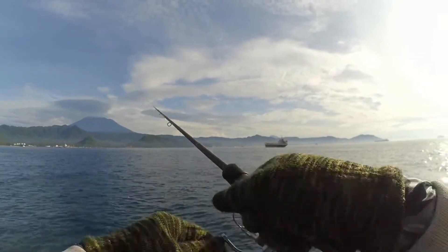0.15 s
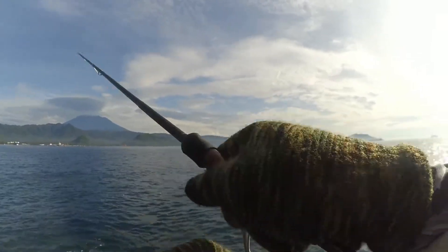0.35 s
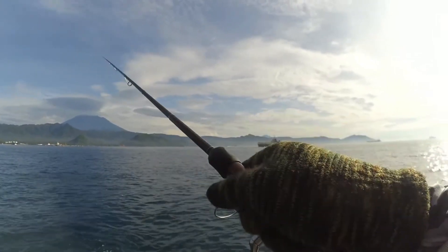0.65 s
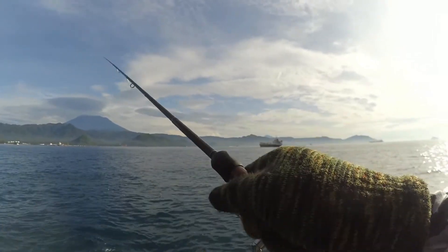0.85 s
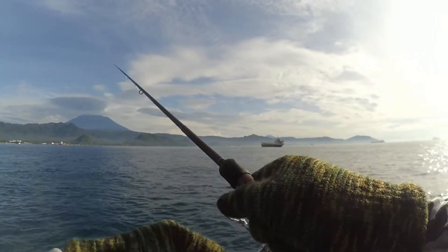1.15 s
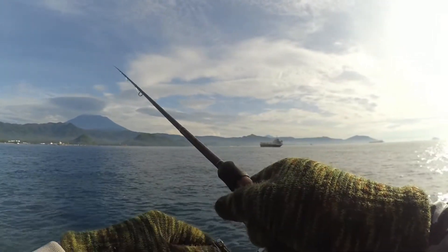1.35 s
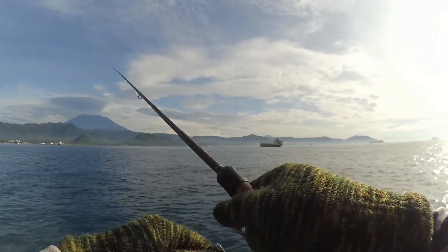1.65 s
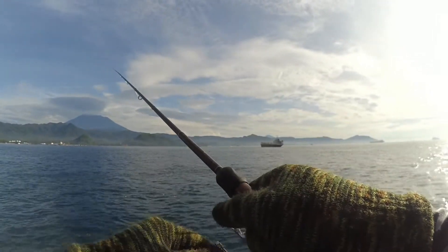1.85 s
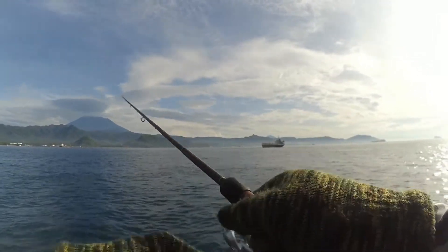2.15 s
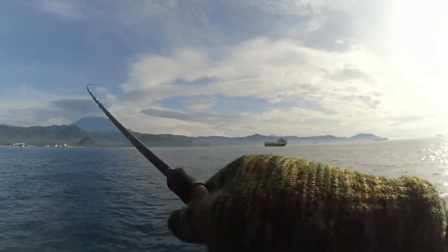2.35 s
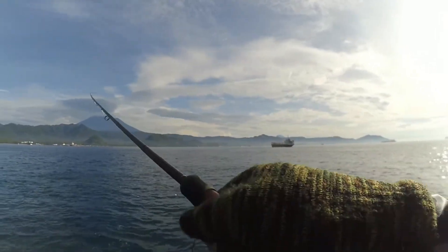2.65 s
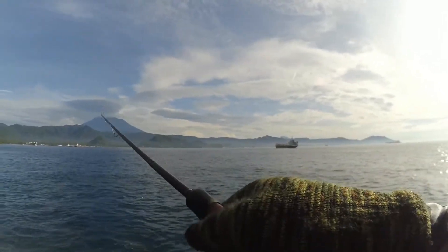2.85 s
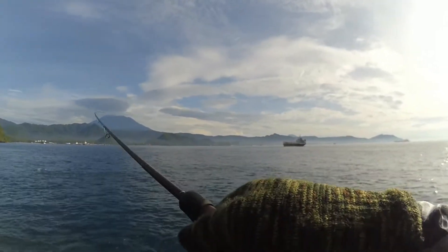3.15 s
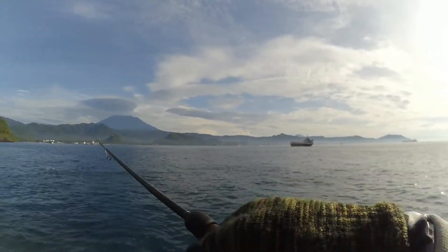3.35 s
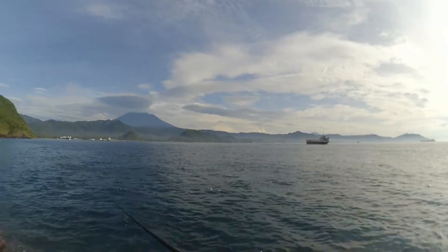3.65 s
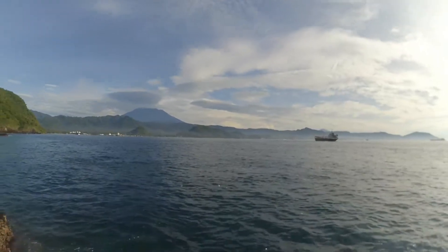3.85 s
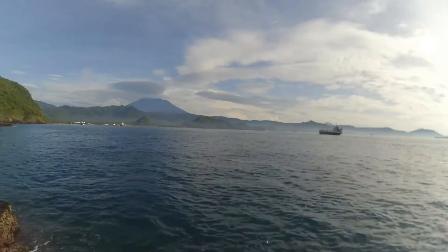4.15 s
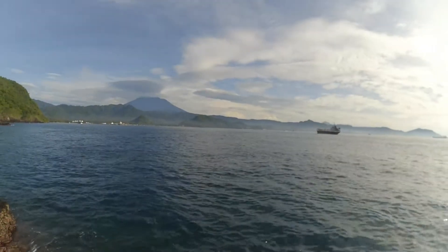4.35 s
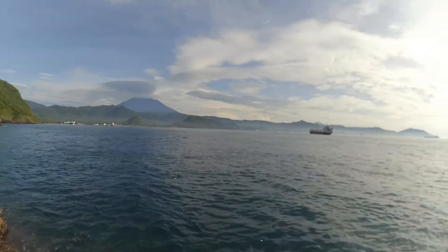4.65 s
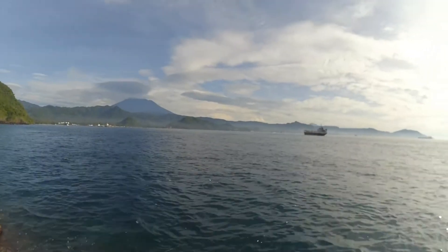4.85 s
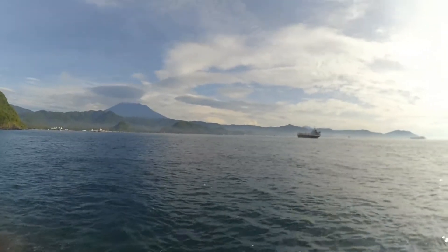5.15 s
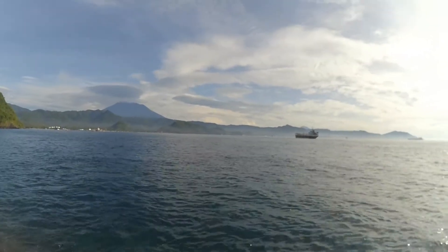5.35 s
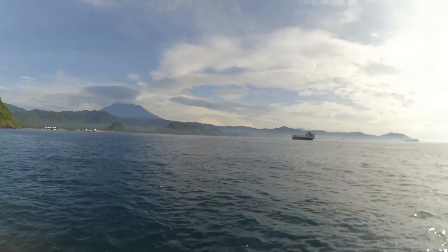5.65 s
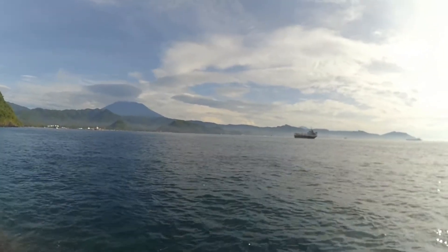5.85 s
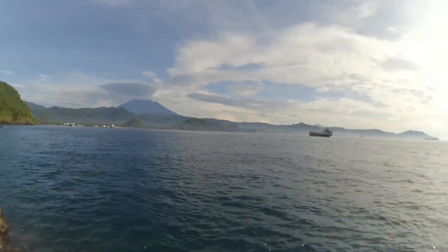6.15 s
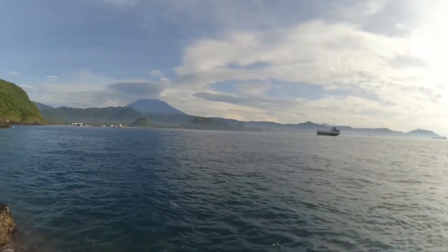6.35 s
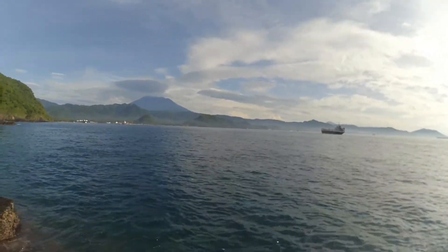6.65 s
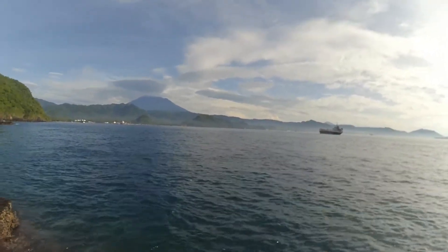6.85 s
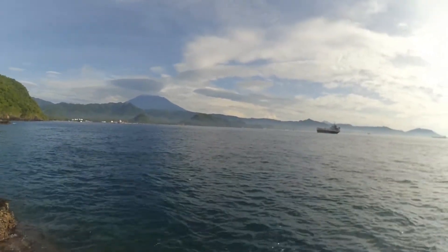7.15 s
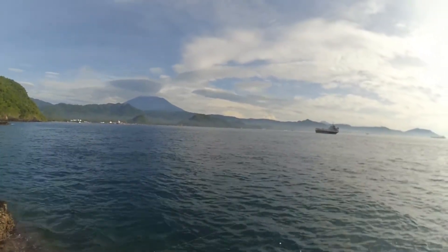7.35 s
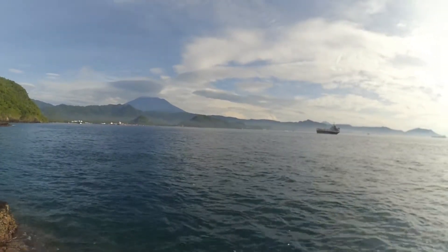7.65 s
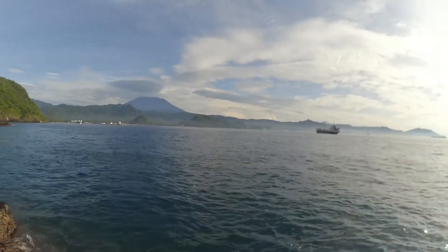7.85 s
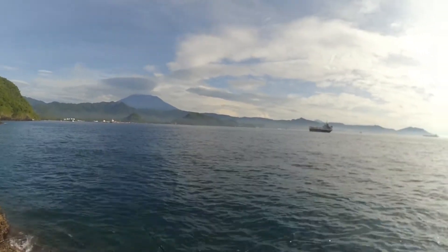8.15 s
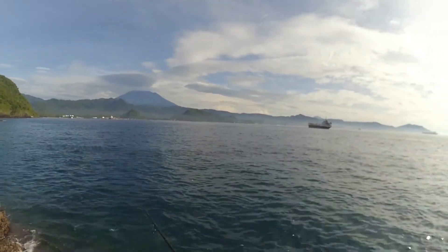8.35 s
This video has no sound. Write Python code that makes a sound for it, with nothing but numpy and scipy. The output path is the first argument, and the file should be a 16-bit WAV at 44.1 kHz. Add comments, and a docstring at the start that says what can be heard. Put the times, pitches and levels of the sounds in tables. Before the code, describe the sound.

Sea waves wash and slap on shore rocks, heard through a hollow camera case with deep wind rumble, a steady heartbeat thump and early gear knocks.

```python
"""Angler on shore rocks

Waves wash and splash on the rocks: noise, tiny impacts and ringing bubbles, coloured by a hollow camera case.
The case is strapped to an angler's chest: the heartbeat thumps through the strap as a chest wall set swinging.
Wind buffets the case with deep rumble and single eddies, and the case rubs on the clothing.
Fishing gear bumps it a few times with knock, scrape, ring and thud; a wavering hiss and faint whine lie under all."""
import sys
import numpy as np
from scipy import signal
from scipy.fft import rfft, irfft
from scipy.io import wavfile

SR = 44100
rng = np.random.default_rng(int(sys.argv[2]) if len(sys.argv) > 2 else 0)


def master_out(mix):
    """Clip the mix to full scale and print it as 16-bit PCM to the path in sys.argv[1]."""
    frames = np.transpose(np.atleast_2d(mix))
    ceiling = np.clip(frames, -1, 1)
    pcm = np.round(ceiling * 32767).astype(np.int16)
    wavfile.write(sys.argv[1], SR, pcm)


N = 374850  # samples, 8.5 s
TIME = np.arange(N) / SR
FREQS = np.maximum(np.fft.rfftfreq(2 ** 15, 1 / SR), 1)  # grid for the colouring filters, Hz

# waves running up the rocks: (arrival [s], rise [s], crest [dB], ebb [dB/s])
WAVES = [(-0.25, 0.16, -52, 7), (.47, 0.39, -58, 30), (1.84, 0.22, -51.5, 2.5), (2.05, 0.66, -49, 4.5),
         (3.7, 0.48, -52.5, 14), (5.0, 0.32, -57, 6.5), (5.8, 0.19, -53, 5.5), (6.95, 0.18, -51, 0),
         (7.25, 0.76, -47, 2.5)]
# splashes on the rocks: (time [s], slap of water [dB], spray [dB], slap decay [s])
SPLASHES = [(.035, -48, -53, 0.022), (0.574, -47, -60, 0.021), (.648, -54, -53, 0.0054),
            (0.798, -51.5, -52, 0.01), (1.098, -53, -62, 0.009), (1.8, -57, -57, 0.023),
            (2.03, -55, -60, 0.04), (2.55, -52, -65, 0.015), (2.905, -45.5, -62, 0.019),
            (3.118, -59, -49, 0.0063), (3.208, -46, -51, 0.011), (3.355, -52, -50, 0.021),
            (3.588, -48, -69, 0.026), (3.965, -45.5, -58, 0.016), (4.17, -52, -55, 0.081),
            (4.33, -52, -76.5, 0.041), (5.286, -47, -49, 0.0083), (5.35, -56, -66, 0.015),
            (5.445, -49, -57, 0.014), (5.495, -49, -57, 0.023), (5.728, -53.5, -59.5, 0.022),
            (5.83, -54, -54, 0.027), (5.955, -46.5, -53, 0.025), (6.195, -51, -56, 0.019),
            (6.335, -51, -56.5, .028), (6.425, -49.5, -52, 0.015), (6.903, -48, -50.5, 0.011),
            (7.105, -51, -56, 0.022), (7.345, -46.5, -55, 0.019)]
# water slopping between the rocks: (time [s], level [dB], decay [s])
SLOSHES = [(1.068, -56, 0.025), (1.86, -53, 0.027), (3.115, -55.5, 0.038), (3.29, -55, 0.014),
           (3.945, -52, 0.045), (4.335, -51, 0.038), (4.56, -52, 0.067), (5.26, -49.5, 0.04),
           (5.39, -67, 0.027), (5.49, -51, 0.028), (5.755, -56, 0.019), (5.95, -58, 0.036),
           (6.195, -47.5, 0.038), (6.429, -51, 0.016), (6.64, -48.5, 0.027), (6.895, -56.5, 0.017),
           (7.43, -55, 0.015), (7.91, -58, 0.026)]
# drops landing close by: (time [s], level before colouring [dB])
DROPLETS = [(0.606, -51), (2.875, -46), (4.178, -46), (4.207, -45), (4.483, -49.5), (4.698, -52),
            (4.82, -50), (5.96, -46), (6.193, -49), (6.391, -49.5), (6.554, -48), (6.67, -54), (6.686, -53),
            (7.011, -50), (7.079, -49), (7.126, -48), (7.353, -43)]
# short ringing slaps of water: (time [s], pitch [Hz], level [dB])
RINGING_SLAPS = [(0.448, 1010, -43), (.813, 950, -42.5), (1.1, 1360, -45), (1.101, 970, -46),
                 (1.415, 990, -49.5), (2.561, 2200, -41), (2.672, 965, -45), (3.207, 1370, -43),
                 (3.355, 1010, -43), (3.592, 1350, -38.5), (4.196, 970, -41), (4.617, 964, -42.5),
                 (5.309, 970, -47), (5.354, 1674, -46.5), (5.476, 956, -43), (5.516, 2290, -45.5),
                 (6.2, 2255, -44), (6.439, 982, -46.5), (6.901, 1420, -49), (7.162, 1620, -44),
                 (7.932, 985, -42)]
# wind on the case: (time [s], buffeting before trim [dB])
GUSTS = [(0, -36.5), (.7, -36.5), (1.1, -42.5), (1.8, -40.5), (2.25, -23.5), (2.93, -33), (3.3, -26),
         (3.7, -28.5), (4.2, -26), (4.47, -28.5), (5.0, -23.5), (5.12, -25.5), (5.55, -19.5), (5.8, -25.5),
         (6.2, -21.5), (6.48, -25), (6.8, -21.5), (7.2, -23), (7.45, -21), (7.8, -24.5), (8.15, -33.5),
         (8.5, -35)]
# single eddies slapping the case: (time [s], level [dB], width [s])
BUFFETS = [(2.531, -21, 0.017), (3.104, -20.5, 0.012), (3.591, -27.5, 0.0076), (3.74, -26.5, .016),
           (4.161, -24, 0.0074), (4.298, -17, .011), (4.534, -20.5, 0.015), (4.765, -20, 0.026),
           (4.875, -14.5, .013), (4.996, -18, 0.015), (5.243, -9.5, 0.012), (5.45, -17, 0.015),
           (5.545, -18, 0.0082), (5.701, -18.5, 0.008), (6.175, -10, 0.012), (6.857, -15, 0.011),
           (7.09, -13, 0.0085), (7.547, -14.5, 0.01), (7.78, -27, 0.012)]
# gear bumping the case: (time [s], knock before its low-pass [dB], knock decay [s], scrape before colouring [dB],
# scrape decay [s], wall ring before mode level [dB], thud [dB], thud pitch [Hz])
BUMPS = [(0.259, -28.5, .0016, -44, .004, -52, -30, 55),
         (0.273, -26, 0.0015, -36.5, 0.0061, -35, -30, 54.7),
         (0.2837, -30, 0.0014, -36, .008, -40, -40, 131), (0.2892, -41, 0.001, -46, 0.012, -37, -47, 60),
         (2.2402, -25.5, 0.003, -39.5, 0.0063, -34.5, -22, 56),
         (2.323, -32, 0.0029, -40, .02, -50, -20, 85)]
# heartbeats, levels of the pushes before trim: (time [s], lub [dB], dub [dB], width of the lub's first push [s])
BEATS = [(0.351, -12.5, -21.5, 0.0057), (1.08, -12, -20.5, 0.0057), (1.846, -12, -21.5, 0.0054),
         (2.607, -12, -20.5, 0.0059), (3.294, -14, -24.5, 0.0058), (3.969, -9.5, -23.5, 0.0062),
         (4.665, -11.5, -25.5, .0055), (5.346, -12, -28, 0.0057), (5.967, -10, -31, 0.0066),
         (6.63, -11, -30.5, 0.0053), (7.271, -10, -27, 0.0053), (7.925, -12.5, -24.5, 0.0062)]
# resonances and hollows of the case: (centre [Hz], width [Hz], boost or cut [dB])
CASE_RESONANCES = [(975.5, 169, 14), (1145, 131, -14), (1386, 134, 8.5), (1658, 215, 4), (2231, 233, 8.5),
                   (2843, 264, 10), (3160, 460, -3), (3530, 210, 6.5), (3830, 200, 6.5), (4246, 88, 8.5),
                   (4990, 420, 3), (5900, 400, 3), (7330, 390, 6)]
# modes of the case wall: (pitch [Hz], relative level [dB], decay [s])
WALL_MODES = [(983, -2, 0.0058), (650, -11.5, 0.003)]

# spectra, shapes only: (frequency [Hz], relative density [dB per Hz])
WATER_SPECTRUM = [(100, 0), (300, 2), (600, 2.5), (1000, 5), (2000, 2), (3000, -3), (4200, -4),
                  (8000, -42.5), (15000, -50)]
FOAM_SPECTRUM = [(1500, -14.5), (2600, 1), (3600, 0.5), (5000, 1), (7000, -0.5), (8500, -3), (10500, -10.5),
                 (15000, -12.5)]
SURGE_SPECTRUM = [(40, -4), (120, 5.5), (220, -1.5), (350, -3), (600, -9.5), (1200, -9.5), (4000, -36.5)]
SPRAY_SPECTRUM = [(1500, 6), (2600, 1), (3600, 11.5), (5000, 9), (7000, 9), (8500, 8), (10500, 1),
                  (15000, -20)]
SLOSH_SPECTRUM = [(60, -12.5), (150, 5.5), (300, -1.5), (550, -8.5), (900, -20.5), (3000, -40)]
TICK_SPECTRUM = [(1500, -27), (3500, -22), (5500, 7), (8000, 2), (10500, -11), (15000, -13)]
WIND_SPECTRUM = [(5, -16.5), (11, 0.5), (18, 1.5), (30, -8.5), (45, -19.5), (65, -25), (100, -32),
                 (160, -45), (300, -54), (1000, -99)]
SCRAPE_SPECTRUM = [(60, 7.5), (200, 2.5), (330, 1.5), (450, -1), (700, -4), (1000, -12.5), (2000, -15),
                   (3500, -32), (9000, -34)]
HISS_SPECTRUM = [(100, 12), (1000, 6), (5000, -2), (9000, -1), (12000, -1), (15000, -8)]

CALM_DB = -63.5  # the sea between waves
FULL_WASH_DB = -50  # reference level for foam and churn
CHURN_DB, CHURN_FOLLOW = -58.5, 0.2  # low churning under a wash of FULL_WASH_DB; dB it gains per dB of wash
FOAM_FOLLOW = 1.01  # dB that the foam gains per dB of wash
PATTER_PER_S, PATTER_DB, PATTER_DECAY_S = 5.9, -1.5, 0.0051  # small stray splashes; slap relative to the swell
SLAP_RING_DECAY_S, DROPLET_DECAY_S, THUD_DECAY_S = 0.0065, 0.0025, 0.014
DUB_SHARE = 0.272  # the dub follows the lub after this share of a beat
TOP_HZ = 15200  # top limit of the sound


def undb(db):
    """Decibels to gain."""
    return 10 ** (np.asarray(db) / 20)


def unit(x):
    """Scale to rms 1."""
    return x / np.sqrt(np.mean(x ** 2))


def curve(rows, axis=1):
    """One column of a table, joined by straight lines in time."""
    rows = np.array(rows)
    return np.interp(TIME, rows[:, 0], rows[:, axis])


def walk(rate):
    """Random levels, rate of them a second, joined by straight lines; rms 1."""
    knots = np.arange(0, TIME[-1] + 1, 1 / rate)
    return unit(np.interp(TIME, knots, rng.standard_normal(len(knots))))


def colour(x, points, extra_db=0):
    """Causal filter with the given spectrum; white noise keeps its power."""
    hz, db = np.transpose(points)
    gain = unit(undb(np.interp(np.log(FREQS), np.log(hz), db) + extra_db))
    # folding the cepstrum forward gives minimum phase, so nothing sounds early
    cepstrum, half = irfft(np.log(gain)), len(FREQS) - 1
    cepstrum[1:half] *= 2
    cepstrum[half + 1:] = 0
    impulse = irfft(np.exp(rfft(cepstrum)))[:half]
    return signal.fftconvolve(x, impulse)[:N]


def case_db():
    """The closed case's resonances and hollows, as dB over frequency."""
    return sum(db / (1 + (2 * (FREQS - hz) / width) ** 2) for hz, width, db in CASE_RESONANCES)


def drops(rate, spread_db):
    """Dense tiny impacts at rate per second; a wider spread makes a few stand out; rms 1."""
    hit = rng.random(N) < rate / SR
    size = undb(spread_db * np.minimum(rng.exponential(size=N), 4))
    return unit(hit * size * rng.choice([-1, 1], N))


def flicker(x, depth_db, rate):
    """Each octave swells and fades by itself at random, so the texture flickers; rms 1."""
    spectrum = rfft(x)
    octave = np.log2(np.clip(np.fft.rfftfreq(N, 1 / SR), 700, 11200) / 700)
    total = np.zeros(N)
    for k in range(5):
        band = irfft(spectrum * np.maximum(1 - abs(octave - k), 0), N)
        total += band * undb(depth_db * walk(rate))
    return unit(total)


def bubbles(count, low_hz, high_hz, cycles, spread_db):
    """Small bubbles ring for a few cycles and rise in pitch as they reach the surface; rms 1."""
    out = np.zeros(N + SR)
    for when, size, strength in rng.random((count, 3)):
        hz = low_hz * (high_hz / low_hz) ** size
        life = np.arange(int(4 * cycles / hz * SR)) * hz / (cycles * SR)  # age in decay times
        ring = np.exp(-life) * np.sin(2 * np.pi * cycles * life * (1 + 0.017 * life))
        first = int(when * N)
        out[first:first + len(ring)] += ring * undb(spread_db * min(-np.log(1 - strength), 4))
    return unit(out[:N])


def bursts(times, dbs, decays, rise, ring_hz=None):
    """Envelopes that swell quickly and die away; with ring_hz each one swings at its own pitch."""
    out, age = np.zeros(N + SR), TIME[:SR // 3]
    for k, (s, db, decay) in enumerate(zip(times, dbs, decays)):
        shape = (1 - np.exp(-age / rise)) * np.exp(-age / decay)
        swing = 1 if ring_hz is None else -np.sin(2 * np.pi * ring_hz[k] * age)
        out[int(s * SR):][:len(age)] += undb(db) * swing * shape / shape.max()
    return out[:N]


def swell_db():
    """Level of the surf: each wave builds, crests and ebbs away over the calm sea."""
    power = undb(CALM_DB) ** 2
    for s, rise, db, ebb in WAVES:
        age = TIME - s
        build = np.clip(age / rise, 0, 1) ** 2
        crest = undb(db - ebb * np.maximum(age - rise, 0)) ** 2
        power = power + build * crest
    return 10 * np.log10(power)


def sea(case, water_db=-2.0, foam_db=-3.5, spurt_db=0.5, churn_spurt_db=2.5):
    """Water tumbles over the rocks in uneven spurts; bubbles ring in it and its foam fizzes."""
    wash_db = swell_db() + spurt_db * walk(15)
    fullness_db = wash_db - FULL_WASH_DB
    # a weak wash breaks up into single spurts, a full one is more even
    patchy_db = np.interp(wash_db, [-54, -47], [2.2, 1.65])
    water = flicker(drops(rate=2500, spread_db=0) + rng.standard_normal(N), patchy_db, rate=90)
    rings = 0.3 * bubbles(count=3500, low_hz=1100, high_hz=7500, cycles=5, spread_db=2.5)
    tumble = colour(undb(wash_db + water_db) * (water + rings), WATER_SPECTRUM, case)
    foam = flicker(drops(rate=4000, spread_db=4) + rng.standard_normal(N), 0.92 * patchy_db, rate=90)
    foam_level_db = FULL_WASH_DB + FOAM_FOLLOW * fullness_db + foam_db
    fizz = colour(undb(foam_level_db) * foam, FOAM_SPECTRUM, case)
    churn_level_db = CHURN_DB + CHURN_FOLLOW * fullness_db + churn_spurt_db * walk(25)
    churn = colour(rng.standard_normal(N) * undb(churn_level_db), SURGE_SPECTRUM)
    return tumble + fizz + churn


def sloshes(rise_s=0.013, gurgle_db=-3):
    """Water slops into the gaps between the rocks with a dull, rough gurgle."""
    s, db, decay = np.transpose(SLOSHES)
    gurgle = bubbles(count=900, low_hz=170, high_hz=620, cycles=2.5, spread_db=1.5)
    rush = colour(rng.standard_normal(N), SLOSH_SPECTRUM)
    return bursts(s, db, decay, rise=rise_s) * (rush + undb(gurgle_db) * gurgle)


def ringing_slaps():
    """Short slaps of water, each ringing briefly at one pitch, mostly near a resonance of the case."""
    s, hz, db = np.transpose(RINGING_SLAPS)
    return bursts(s, db, np.full(len(s), SLAP_RING_DECAY_S), rise=0.005, ring_hz=hz)


def droplets(case):
    """Single flung drops land on the rock close by, each with a bright tick."""
    s, db = np.transpose(DROPLETS)
    tick = bursts(s, db, np.full(len(s), DROPLET_DECAY_S), rise=0.0015)
    return colour(tick * rng.standard_normal(N), TICK_SPECTRUM, case)


def patter(spray_db=-2):
    """Rows of small splashes at chance moments, their level tied to the swell that throws them."""
    s = rng.random(int(PATTER_PER_S * N / SR)) * TIME[-1]
    slap_db = np.interp(s, TIME, swell_db()) + PATTER_DB
    return np.column_stack([s, slap_db, slap_db + spray_db, np.full(len(s), PATTER_DECAY_S)])


def splashes(case, rise_s=0.017, patchy_db=3, lumpy_db=2):
    """Single wavelets slap the rock and throw a short, uneven patter of spray."""
    s, slap_db, spray_db, decay = np.vstack([SPLASHES, patter()]).T
    lumps = flicker(rng.standard_normal(N), lumpy_db, rate=120)
    slap = bursts(s, slap_db, decay, rise=rise_s) * lumps
    specks = flicker(drops(rate=6000, spread_db=6.5), patchy_db, rate=80)
    spray = bursts(s, spray_db, 0.72 * decay, rise=rise_s) * specks  # spray dies sooner than the slap
    return colour(slap, WATER_SPECTRUM, case) + colour(spray, SPRAY_SPECTRUM, case)


def wind(wind_db=-1.5, gust_spread_db=2.8):
    """Slow eddies press on the case as a deep rumble with lulls; strong single ones suck and then push."""
    level_db = curve(GUSTS) + wind_db + gust_spread_db * walk(11)
    out = colour(rng.standard_normal(N), WIND_SPECTRUM) * undb(level_db)
    for s, db, width in BUFFETS:
        age = (TIME - s) / width
        out += undb(db) * 2 * age * np.exp(-np.minimum(age ** 2, 50))
    return out


def rustle(motion, case, rustle_db=-35):
    """Whenever the case is pushed about, it rubs softly on the clothing."""
    return undb(rustle_db) * colour(abs(motion) * rng.standard_normal(N), SCRAPE_SPECTRUM, case)


def bumps(case):
    """Gear knocks on the case and scrapes briefly, rings its wall and makes it thud on its mount."""
    s, knock_db, knock_s, scrape_db, scrape_s, wall_db, thud_db, thud_hz = np.transpose(BUMPS)
    low_pass = signal.butter(2, 1500, fs=SR, output="sos")
    knock = -signal.sosfilt(low_pass, bursts(s, knock_db, knock_s, rise=0.0005))
    scrape = bursts(s, scrape_db, scrape_s, rise=0.002) * drops(rate=6000, spread_db=1)
    ring = np.zeros(N)
    for hz, db, decay in WALL_MODES:
        ring += bursts(s, wall_db + db, np.full(len(s), decay), rise=0.0012, ring_hz=np.full(len(s), hz))
    thud = bursts(s, thud_db, np.full(len(s), THUD_DECAY_S), rise=0.0028, ring_hz=thud_hz)
    return knock + colour(scrape, SCRAPE_SPECTRUM, case) + ring + thud


def thump(times, dbs, first_widths, split, second_width, second_db, chest_hz, damping):
    """Two valves shut one after the other; each soft push sets the chest wall swinging."""
    push = np.zeros(N)
    for s, db, first_width in zip(times, dbs, first_widths):
        near = slice(max(int((s - 0.1) * SR), 0), int((s + 0.2) * SR))
        age = TIME[near] - s
        first = np.exp(-(age / first_width) ** 2)
        second = undb(second_db) * np.exp(-((age - split) / second_width) ** 2)
        push[near] += undb(db) * (first + second)
    # the chest wall as a damped resonant high-pass
    w = 2 * np.pi * chest_hz
    b, a = signal.bilinear([1, 0, 0], [1, damping * w, w * w], SR)
    return signal.lfilter(b, a, push)


def heart(lub_db=-0.5, dub_db=1):
    """A deep lub and a lighter, shorter dub through the chest strap; a quicker pulse draws them closer."""
    s, first_db, second_db, width = np.transpose(BEATS)
    lub = thump(s, first_db + lub_db, width, split=0.041, second_width=0.008, second_db=-1,
                chest_hz=14.36, damping=0.29)
    dub_s = s + DUB_SHARE * np.gradient(s)
    dub = thump(dub_s, second_db + dub_db, np.full(len(s), 0.004), split=0.024, second_width=0.007,
                second_db=-5, chest_hz=32, damping=0.6)
    return lub + dub


def scene():
    """Sea, wind, gear and body at one microphone."""
    case = case_db()
    water = sea(case) + sloshes() + ringing_slaps() + droplets(case) + splashes(case)
    motion = wind() + heart()
    return (water + motion + rustle(motion, case) + bumps(case))[None]


def record(dry, hiss_db=-60.5, waver_db=2.0, whine_db=-86):
    """A hiss whose level wavers at random, with a faint whine and no sound above the top limit."""
    hiss = undb(hiss_db + waver_db * walk(10)) * colour(rng.standard_normal(N), HISS_SPECTRUM)
    whine = undb(whine_db) * np.sin(2 * np.pi * 10000 * TIME)
    top_cut = signal.ellip(10, 0.2, 80, TOP_HZ, fs=SR, output="sos")
    return signal.sosfilt(top_cut, dry + hiss + whine)


dry = scene()
out = record(dry)
master_out(out)
```